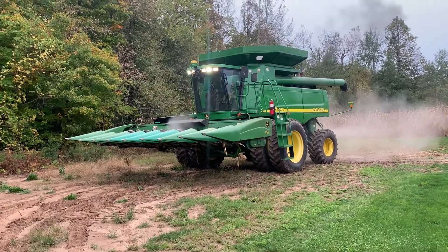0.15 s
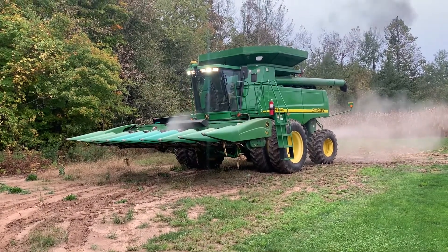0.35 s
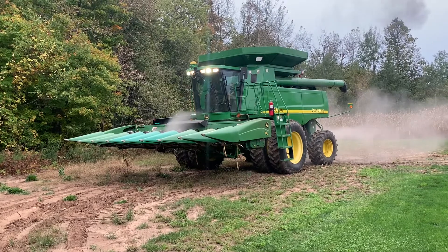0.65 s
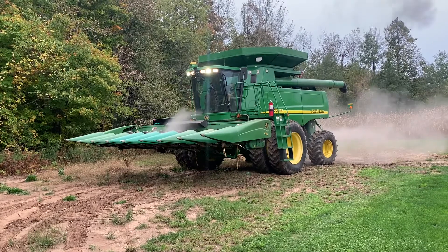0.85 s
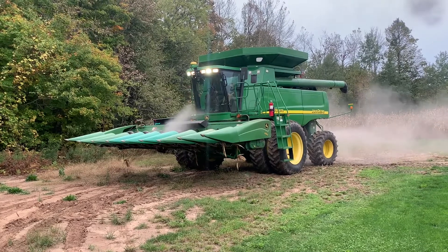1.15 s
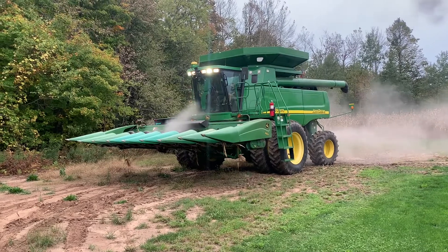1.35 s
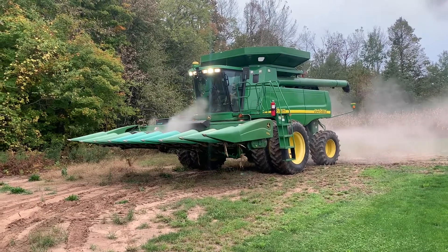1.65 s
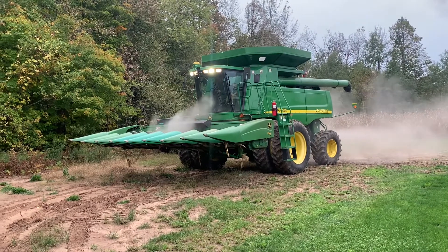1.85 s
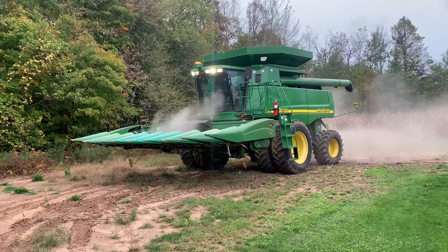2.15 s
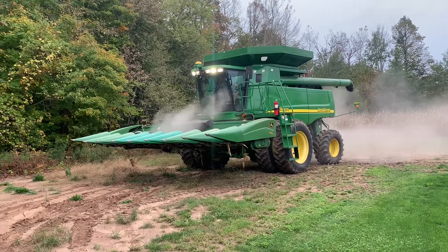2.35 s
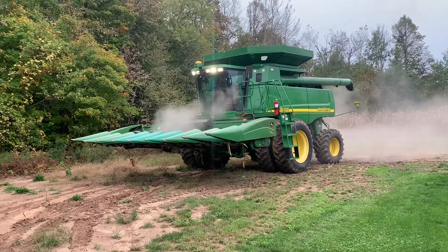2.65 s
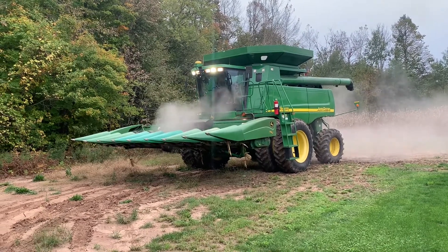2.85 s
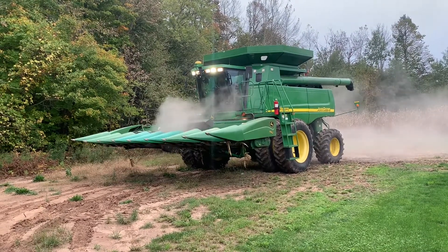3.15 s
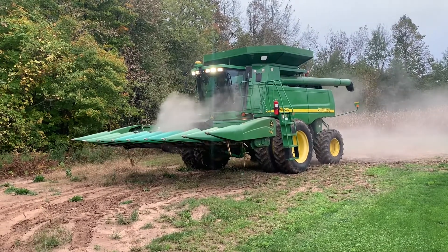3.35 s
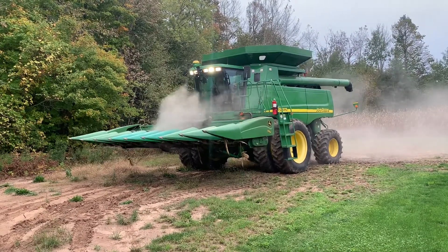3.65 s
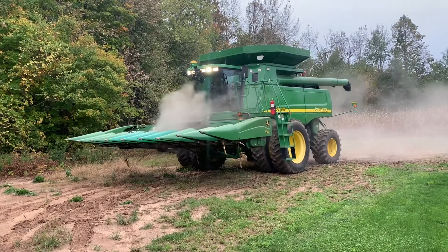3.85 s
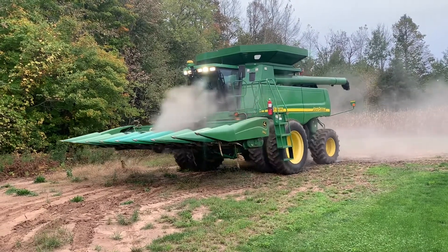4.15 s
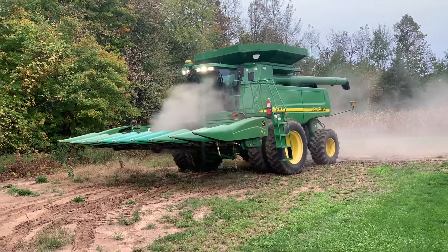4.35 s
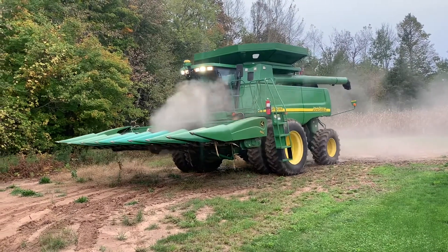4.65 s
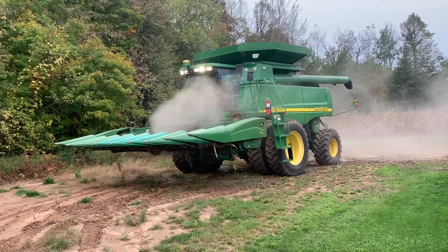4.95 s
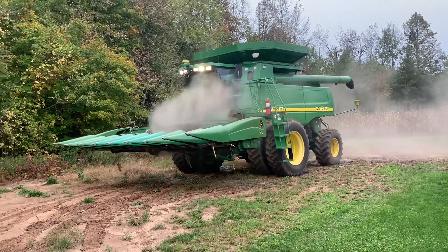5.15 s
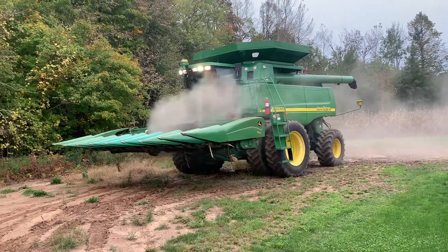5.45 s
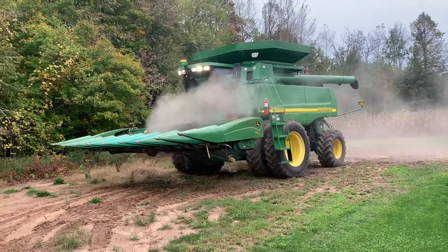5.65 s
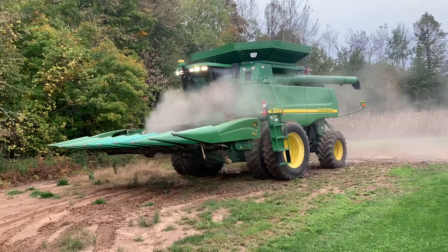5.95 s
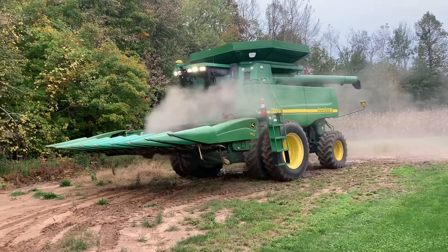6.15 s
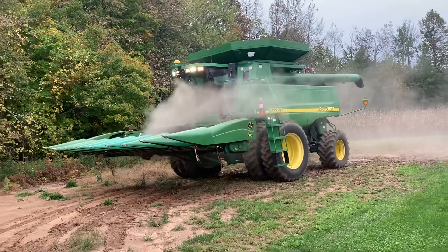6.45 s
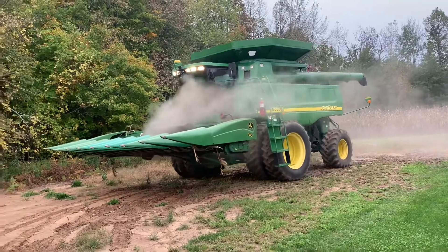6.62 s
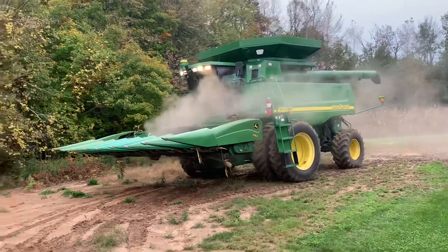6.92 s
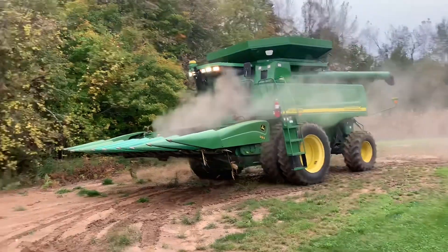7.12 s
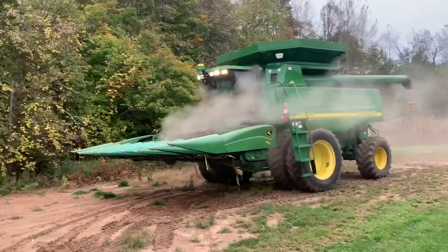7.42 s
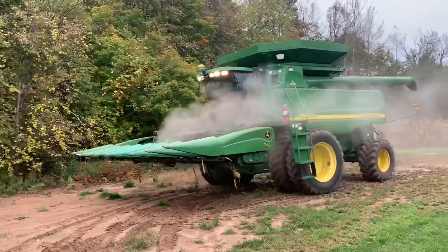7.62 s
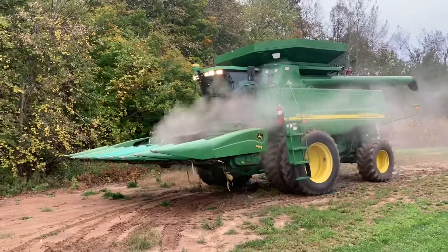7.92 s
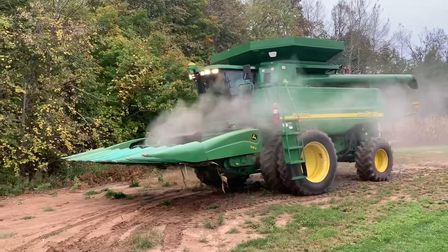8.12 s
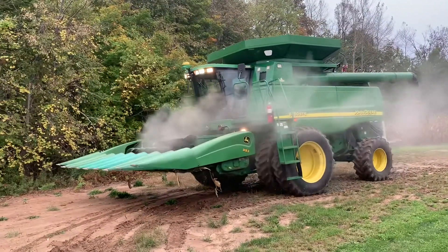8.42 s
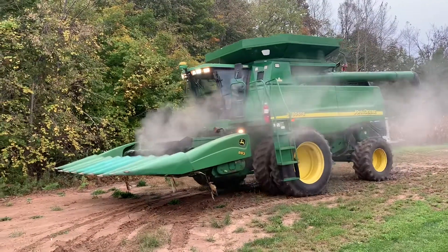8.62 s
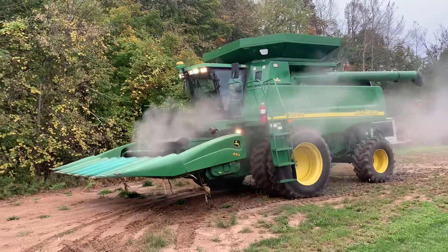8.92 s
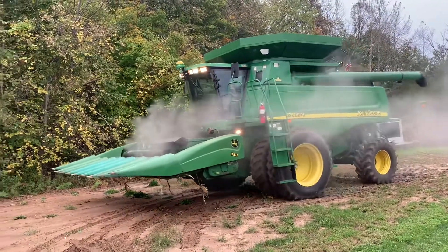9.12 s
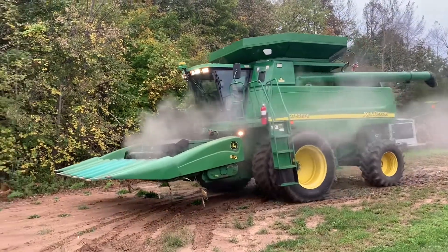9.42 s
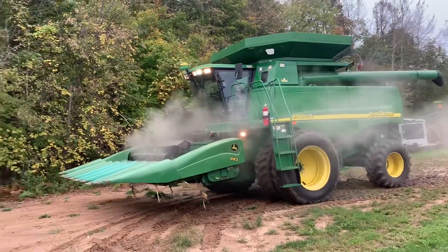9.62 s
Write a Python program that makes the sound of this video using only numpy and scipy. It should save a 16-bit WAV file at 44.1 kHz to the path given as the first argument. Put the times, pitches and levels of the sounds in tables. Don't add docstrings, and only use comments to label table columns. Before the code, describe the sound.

Heavy combine engine hum and fan roar run steadily as a slipping belt squeals early, followed by constant chain rattle with bright pings.

```python
import sys
import numpy as np
from scipy import signal
from scipy.fft import rfft, irfft, next_fast_len
from scipy.io import wavfile
from scipy.ndimage import uniform_filter1d

SR = 44100
rng = np.random.default_rng(int(sys.argv[2]) if len(sys.argv) > 2 else 0)


def gain_from_decibels(decibels):
    exponent = np.asarray(decibels, float) / 20
    return 10 ** exponent


def pcm_store(signal):
    levels = np.round(np.clip(np.atleast_2d(signal), -1, 1) * 32767)
    wavfile.write(sys.argv[1], SR, levels.astype(np.int16).T)


N = 431298
SIZE = next_fast_len(N)
HZ = np.maximum(np.arange(SIZE // 2 + 1) * SR / SIZE, 1)
TIME = np.arange(N) / SR

# t/s, half the firing rate f/Hz
CRANK = [(0, 58.58), (1.2, 58.5), (1.5, 57.87), (1.68, 56.8), (1.82, 57.27), (1.98, 58.47), (2.3, 58.55),
         (3.0, 57.98), (3.5, 58.1), (4.0, 58.33), (5.0, 58.66), (5.5, 58.48), (6.5, 58.62), (8.0, 58.8),
         (9.78, 58.5)]
# multiple of half the firing rate, level/dB
EXHAUST_ORDERS = [(4, -36), (7, -43), (10.667, -46), (21.58, -43)]
# f/Hz, level/dB per Hz
CLATTER = [(290, -27), (500, -7.5), (1090, -4.5), (1290, 0.5), (1570, -8.5), (2290, -3.5), (2550, 0),
           (2890, -21), (5000, -12), (6500, -61), (11000, -120)]
# t/s, drum line level/dB
FACING = [
    (0, -17.5),
    (1.5, -18),
    (4.5, -19.5),
    (5.7, -25),
    (7.3, -33),
    (8.1, -32.5),
    (8.8, -22.5),
    (9.4, -23),
    (9.78, -25.5),
]
# f/Hz, level/dB
IDLERS = [(216, -35), (478, -46.5), (1050, -47), (1152, -46)]
# line, middle t/s, length t/s, rise level/dB
SWELLS = [("half", 8.02, 5.53, 4), ("half", 5.094, 1.4, -4), ("firing", 3.2, 1.61, 9),
          ("firing", 5.4, 3.4, 12), ("firing", 7.11, 1.37, 8.9), ("third", 0.53, 2.4, 10),
          ("third", 3.8, 2.3, 11), ("third", 5, 0.91, 12.5), ("third", 8.2, 0.99, 9.3),
          ("blower", .3, 2, 4), ("blower", 8.44, 1.8, 7), ("blower", 9.6, 1.2, 8.9),
          ("second", 0.75, 2.4, 4), ("second", 3.77, 1, 2.58), ("second", 9.67, 2.3, 8.3),
          ("fan", 3.003, 1, 8.7), ("fan", 7, 5.5, 7.5), ("pump", 3.6, 1.29, 15), ("pump", 5.1, 4, 6),
          ("pump", 8.8, 1.9, 11), ("gears", .6, 1.6, 5), ("gears", 4.5, 1.64, 10),
          ("gears", 7.1, 1.1, 10.9), ("gears", 9.1, .8, 6), ("duct", .3, 4.2, 10), ("duct", 5.43, 0.9, 9.3),
          ("duct", 6.51, 2.5, 10.5), ("duct", 8.48, 3.1, 6.03)]
# f/Hz, level/dB
RUMBLE = [(15, -58), (25, -38), (42, -13), (75, -4.5), (110, -6), (170, -4), (250, -8), (330, -10),
          (410, -9.5), (460, -17), (500, -28.5), (560, -45)]
# f/Hz, level/dB
AIR = [(420, -18), (500, -6.5), (560, -1.5), (625, 1), (700, -3), (800, -1.5), (974, -5), (1110, -4),
       (1400, -1.5), (2180, -9.5), (2740, -10.5), (3320, -12.5), (5290, -21), (7000, -27)]
# t/s, centre f/Hz
LOWER_PEAK = [
    (0, 1340),
    (1.1, 1340),
    (1.7, 1460),
    (2.3, 1370),
    (3.6, 1420),
    (6.2, 1480),
    (6.6, 1350),
    (7.3, 1420),
    (9.78, 1345),
]
# t/s, centre f/Hz
UPPER_PEAK = [
    (0, 2545),
    (2.2, 2533),
    (5.3, 2879),
    (6.2, 2739),
    (7.3, 2640),
    (8.4, 2860),
    (9.78, 2751),
]
# delay at the start t/ms, delay at the end t/ms, share
BOUNCES = [(1.9, 1.4, .2), (3.3, 4.1, .27), (5.4, 4.5, .27), (7.1, 8.2, .15)]
# f/Hz, level/dB per Hz
COOLING = [(2650, -23), (4500, 0.5), (4750, -5), (5010, -42), (5400, -17), (5700, -21), (5880, -4),
           (6180, 1), (6900, -22), (7030, -14), (8160, 0), (9290, -19), (11200, -28), (14600, -58),
           (22000, -120)]
# multiple, level/dB
BELT_MULTIPLES = [(1, -3.5), (2, -1)]
# centre f/Hz, width f/Hz, level/dB
GUARD = [(3070, 75, -5), (3390, 86, -5), (3900, 95, -10)]
# f/Hz, level/dB
STEEL = [(3500, -7), (4500, -5.5), (5300, -23), (6300, -10), (7200, -8.5), (7930, -9.5), (8020, 1),
         (8500, -1.5), (9200, -7.5), (10400, -5), (11300, -10.5), (11800, -34)]
# f/Hz, level/dB
SHEEN = [(11000, -17), (11700, 9), (12400, 6.5), (13000, 0), (14400, 0), (15200, -11)]
# t/s, peak level/dB, ring f/Hz
TICKS = [(1.678, -26, 8150), (1.6926, -22, 8710), (2.3038, -26, 10030), (2.3875, -26, 8720),
         (2.7447, -27, 8300), (2.9024, -22, 8460), (3.0644, -22, 8060), (3.0926, -28, 6030),
         (3.1857, -22, 8310), (3.4261, -28, 8630), (3.4783, -27, 9960), (4.468, -21.5, 8400),
         (4.81, -22, 8650), (5.0478, -26, 10030), (5.8381, -21, 8640), (6.188, -24, 8330),
         (6.263, -25, 10100), (6.355, -27, 10190), (6.3852, -23, 10500), (7.0547, -21.5, 8550),
         (7.23, -22, 8660), (7.2477, -28, 6110), (7.5885, -23, 9840), (8.315, -27, 8680),
         (8.6094, -21, 8610), (8.816, -27, 10170), (8.8824, -27, 8410), (8.973, -28, 8150),
         (9.116, -26, 10400), (9.7507, -25, 8130)]
FAINT_LINKS_HZ = (5430, 6350, 8100, 8250, 8350, 8500, 8600, 10200)
# f/Hz, likeness 0-1, left minus right level/dB, left lag/rad
PAIR = [(60, 0.98, -1, 0.23), (434, 1, 0.5, 0.47), (620, 1, -4.5, 1.1), (800, 0.95, -12.5, 0.7),
        (950, 1, -5, 0.7), (1150, 0.87, -4.5, 0.47), (1510, 0.9, -2, 0.7), (2800, 0.45, -2.5, 0.27),
        (4320, 0.66, -1.5, 0.73), (5600, 0.3, -5, 1.5), (8050, 0.4, 0, 1), (8300, 0.4, -8, 3.),
        (9550, .2, -0.5, 2.), (10500, 0.1, 0, -0.3)]
# 0 sum or 1 difference, low f/Hz, high f/Hz, edge scatter f/Hz, share of frames
GAPS = [(0, 11330, 12370, 230, .96), (0, 11680, 12150, 0, .995), (0, 14350, 22000, 200, .995),
        (1, 9750, 10650, 250, .93), (1, 13150, 14050, 150, .985), (1, 14000, 15200, 250, .5)]

RESTING_DB = dict(half=-31, firing=-38, third=-40, blower=-36.5, second=0, fan=-41, pump=-48, gears=-48, duct=-44)
BITE_RISE_DB = dict(half=7, firing=16, clatter=-2, rumble=2, air=1.5)
SLIP_S, BITE_S, LOCK_S = 1.25, 1.7, 2.2
CLATTER_DB, CLATTER_FADE_S, CLATTER_FADE_DB = -32, 7.2, -3
DRUM_RATIO, DRUM_SLIP_DB, SECOND_DB = 1.804, -4, -12
RUMBLE_DB, AIR_DB, HEAD_RISE_DB = -21, -22.5, 2
LOWER_PEAK_DB, LOWER_PEAK_FAR_DB = -32, -6.5
COOLING_DB = -43.5
SQUEAL_HZ, SQUEAL_RISE_HZ, SQUEAL_DB, SQUEAL_RANGE_DB = 706, 69.95, -30.5, 14.5
CHAINS_IDLE_DB, CHAINS_DB, CHAINS_START_S, CHAINS_RUN_UP_S = -41.5, -33.5, 1.3, 0.5
JOLT_S, JOLT_LENGTH_S, JOLT_DB = 1.69, .1, 5
FAINT_TICKS, FAINT_DB, FAINT_SPREAD_DB = 36, -30, 1.5
SNAP_S, SNAP_DB = 8.4015, -23


def unit(x):
    return x / np.sqrt(np.mean(x ** 2))


def curves(table):
    s, *columns = np.transpose(table)
    return [np.interp(TIME, s, c) for c in columns]


def shape(points):
    hz, db = np.transpose(points)
    return gain_from_decibels(np.interp(np.log(HZ), np.log(hz), db, -150, -150))


def walk(rate):
    k = int(SR / rate)
    steps = np.repeat(rng.standard_normal(N // k + 1), k)
    return 1.134 * uniform_filter1d(uniform_filter1d(steps, k), k)[:N]


def hump(middle_s, length_s):
    return np.cos(np.pi * np.clip((TIME - middle_s) / length_s, -.5, .5)) ** 2


def bite():
    return np.interp(TIME, (SLIP_S, BITE_S, LOCK_S), (0, 1, 0))


def head_on():
    return np.interp(TIME, (SLIP_S, BITE_S), (0, 1))


def heard_db(line):
    swells = sum(db * hump(s, length_s) for name, s, length_s, db in SWELLS if name == line)
    return RESTING_DB[line] + swells + BITE_RISE_DB.get(line, 0) * bite()


def tone(hz, db, wobble_db=2.0):
    phase = 2 * np.pi * (np.cumsum(hz) / SR + rng.random())
    return np.sqrt(2) * gain_from_decibels(db + wobble_db * walk(6)) * np.sin(phase)


def hiss(points, flicker_db, rate, drift_db):
    spectrum = rfft(rng.standard_normal((2, SIZE))) * shape(points)
    out = 0
    for octave in np.arange(np.log2(points[0][0]), np.log2(points[-1][0]) + .5, .5):
        share = np.cos(np.pi * np.clip(np.log2(HZ) - octave, -.5, .5)) ** 2
        level = gain_from_decibels(flicker_db * walk(rate) + drift_db * walk(1.157))
        out = out + level * irfft(spectrum * share, SIZE)[:, :N]
    return unit(out)


def ring(hz, width_hz):
    spectrum = rfft(rng.standard_normal((2, 2, SIZE)))
    slow = irfft(spectrum / (1 + (2 * HZ / width_hz) ** 2), SIZE)[..., :N]
    turn = 2 * np.pi * np.cumsum(hz) / SR
    return unit(slow[0] * np.cos(turn) + slow[1] * np.sin(turn))


def diesel():
    hz, = curves(CRANK)
    orders = ((1, "half"), (2, "firing"), (3, "third"), (4.687, "blower"))
    lines = sum(tone(k * hz, heard_db(line), wobble_db=1.5) for k, line in orders)
    lines = lines + sum(tone(k * hz, db, wobble_db=2.5) for k, db in EXHAUST_ORDERS)
    knocks = rng.standard_normal(2048) * gain_from_decibels(5.25 * rng.exponential(size=2048))
    cycle = np.cumsum(hz / 3) / SR % 1
    place = (cycle * len(knocks)).astype(int)
    clatter = irfft(rfft(knocks[place], SIZE) * shape(CLATTER), SIZE)[:N]
    fade_db = np.interp(TIME, (CLATTER_FADE_S, N / SR), (0, CLATTER_FADE_DB))
    clatter_db = CLATTER_DB + BITE_RISE_DB["clatter"] * bite() + fade_db
    return lines + gain_from_decibels(clatter_db) * unit(clatter)


def shafts():
    crank, = curves(CRANK)
    drum_db = curves(FACING)[0] + DRUM_SLIP_DB * bite() ** 2
    out = tone(DRUM_RATIO * crank, drum_db, wobble_db=.5)
    out = out + tone(2 * DRUM_RATIO * crank, drum_db + SECOND_DB + heard_db("second"))
    geared = ((5.45, "fan"), (17.7, "pump"), (45.333, "gears"))
    out = out + sum(tone(k * crank, heard_db(line)) for k, line in geared)
    return out + sum(tone(np.full(N, hz), db, wobble_db=4.0) for hz, db in IDLERS)


def bounce(x):
    treble = signal.sosfilt(signal.butter(2, 1900, "high", fs=SR, output="sos"), x)
    out = x
    for start_ms, end_ms, share in BOUNCES:
        delay_ms = np.linspace(start_ms, end_ms, N) + .05 * walk(1.5)
        then = TIME - delay_ms / 1000
        out = out + share * np.array([np.interp(then, TIME, row) for row in treble])
    return unit(out)


def roar():
    quiet_db = HEAD_RISE_DB * (head_on() - 1)
    rumble_db = RUMBLE_DB + quiet_db + BITE_RISE_DB["rumble"] * bite()
    air_db = AIR_DB + quiet_db + BITE_RISE_DB["air"] * bite()
    turn = 2 * np.pi * np.cumsum(curves(CRANK)[0]) / SR
    shake_db = .5 * np.sin(turn) + 0.28 * np.sin(2 * turn)
    rumble = hiss(RUMBLE, flicker_db=0.66, rate=12, drift_db=-0.05)
    air = bounce(hiss(AIR, flicker_db=0.97, rate=12, drift_db=0.2))
    out = gain_from_decibels(rumble_db + 1.48) * rumble + gain_from_decibels(air_db - 0.59 + shake_db) * air
    lower_peak_db = LOWER_PEAK_DB + LOWER_PEAK_FAR_DB * (1 - head_on()) + 1.1 * walk(3)
    out = out + gain_from_decibels(lower_peak_db) * ring(curves(LOWER_PEAK)[0], 230)
    return out + gain_from_decibels(heard_db("duct")) * ring(curves(UPPER_PEAK)[0], 130)


def radiator_fan():
    fan = hiss(COOLING, flicker_db=1.7, rate=7.7, drift_db=-0.5)
    sheen = hiss(SHEEN, flicker_db=7.0, rate=15, drift_db=-3.0)
    return gain_from_decibels(COOLING_DB) * (fan + gain_from_decibels(-13) * sheen)


def belt():
    hz = SQUEAL_HZ + SQUEAL_RISE_HZ * bite() ** 2
    db = SQUEAL_DB + SQUEAL_RANGE_DB * (bite() ** .5 - 1)
    squeal = sum(gain_from_decibels(level_db) * ring(k * hz, 30 * k ** .5) for k, level_db in BELT_MULTIPLES)
    squeal = squeal + tone(2 * hz * (1 + 0.01212 * walk(25)), 2.3, wobble_db=0.5)
    guard = sum(gain_from_decibels(mode_db) * ring(np.full(N, f), width_hz) for f, width_hz, mode_db in GUARD)
    return gain_from_decibels(db) * (squeal + guard)


def add_tick(out, s, peak_db, hz, length_s, side):
    t = np.arange(int(8 * length_s * SR)) / SR
    i = int(s * SR)
    swell = np.e * t / length_s * np.exp(-t / length_s)
    tick = gain_from_decibels(peak_db) * swell * np.sin(2 * np.pi * hz * t)
    out[:, i:i + len(t)] += np.outer([1, side], tick[:N - i])


def link_pings():
    pings = np.zeros((2, N))
    steel_hz, steel_db = np.transpose(STEEL)
    for when, pitch, size, side in rng.random((2000, 4)):
        hz = 5000 * 2.2 ** pitch
        colour_db = np.interp(np.log(hz), np.log(steel_hz), steel_db)
        size_db = min(-3.0 * np.log(1 - size), 16)
        add_tick(pings, when * N / SR, colour_db + size_db, hz, .003, 2 * side - 1)
    return unit(pings)


def chains():
    run_up_s = (CHAINS_START_S, CHAINS_START_S + CHAINS_RUN_UP_S)
    db = np.interp(TIME, run_up_s, (CHAINS_IDLE_DB, CHAINS_DB)) + JOLT_DB * hump(JOLT_S, JOLT_LENGTH_S)
    gain = np.sqrt(np.maximum(gain_from_decibels(db) ** 2 - gain_from_decibels(COOLING_DB) ** 2, 1e-12))
    sprockets = ((5.85, .65), (17.5, .65), (35, .45))  # Hz, dB
    pulse = gain_from_decibels(sum(depth_db * np.sin(2 * np.pi * hz * TIME) for hz, depth_db in sprockets))
    rattle = hiss(STEEL, flicker_db=0.7, rate=14, drift_db=1.1)
    rattle = rattle + gain_from_decibels(-6.5) * hiss(SHEEN, flicker_db=1.8, rate=14, drift_db=-1.5)
    out = gain * pulse * (gain_from_decibels(-1.0) * rattle + gain_from_decibels(-10.0) * link_pings())
    for s, peak_db, hz in TICKS:
        add_tick(out, s - .001, peak_db - 4, hz, .0024, -1.2)
    for when, size, link in rng.random((FAINT_TICKS, 3)):
        s = BITE_S + when * (N / SR - BITE_S)
        peak_db = FAINT_DB + FAINT_SPREAD_DB * (2 * size - 1)
        hz = FAINT_LINKS_HZ[int(link * len(FAINT_LINKS_HZ))]
        add_tick(out, s, peak_db - 4, hz, .0024, -1.2)
    return out


def stalk_snap():
    out = np.zeros((2, N))
    add_tick(out, SNAP_S, SNAP_DB, 13500, .0003, .7)
    return out


def microphone_pair(alike, scattered):
    hz, *columns = np.transpose(PAIR)
    likeness, balance_db, lag = (np.interp(np.log(HZ), np.log(hz), c) for c in columns)
    likeness = np.clip(likeness, 0, 1)
    common_share, own_share = (1 + likeness) / 2, (1 - likeness) / 2
    common = np.sqrt(common_share) * rfft(alike, SIZE)
    own = np.sqrt(own_share) * rfft(scattered, SIZE)
    lean = gain_from_decibels(balance_db / 2) * np.exp(-.5j * lag)
    left, right = (common + own) * lean, (common - own) / lean
    summed = np.sqrt(common_share * abs(lean + 1 / lean) ** 2 + own_share * abs(lean - 1 / lean) ** 2) / 2
    return irfft(np.array([left, right]) / summed, SIZE)[:, :N]


def empty_bands(x):
    hz, s, cells = signal.stft([x[0] + x[1], x[0] - x[1]], SR, "cosine", nperseg=2048)
    keep = np.ones(cells.shape)
    spared = abs(s - SNAP_S) < .012
    for row, low_hz, high_hz, scatter_hz, share in GAPS:
        edge, chance = 2 * rng.random((2, len(s))) - 1, rng.random(len(s))
        above = hz[:, None] > low_hz + scatter_hz * edge[0]
        below = hz[:, None] < high_hz + .4 * scatter_hz * edge[1]
        keep[row][above & below & (chance < share) & ~spared] = 0
    total, difference = signal.istft(cells * keep, SR, "cosine", nperseg=2048)[1][:, :N]
    return np.array([total + difference, total - difference]) / 2


def scene():
    engine = (diesel() + shafts()) * np.array([[1], [.6]])
    alike, scattered = engine + roar() + radiator_fan() + belt() + chains() + stalk_snap()
    return microphone_pair(alike, scattered)


def roll_off(x):
    return signal.sosfilt(signal.butter(12, 15030, fs=SR, output="sos"), x)


def record(dry):
    rounded = np.tanh(0.61 * dry) / 0.59
    mix = empty_bands(rounded)
    return roll_off(mix)


dry = scene()
out = record(dry)
pcm_store(out)
```